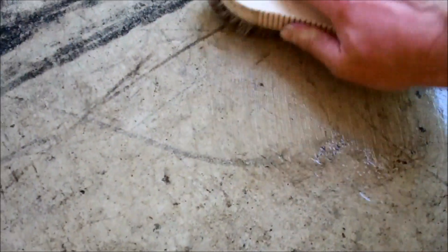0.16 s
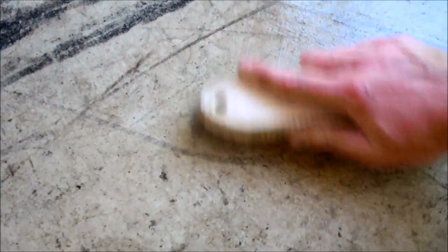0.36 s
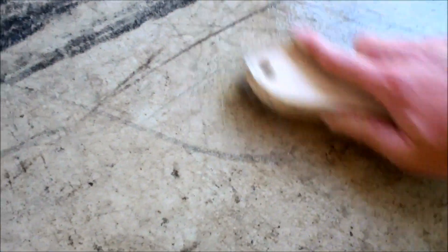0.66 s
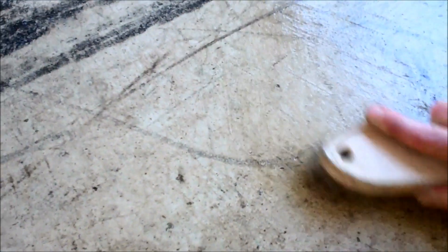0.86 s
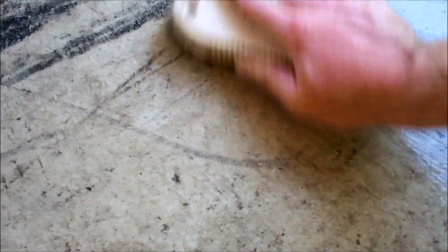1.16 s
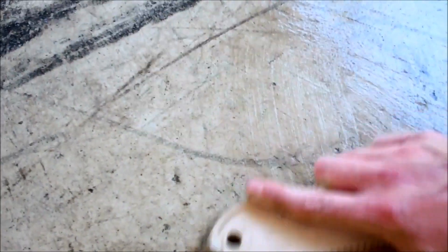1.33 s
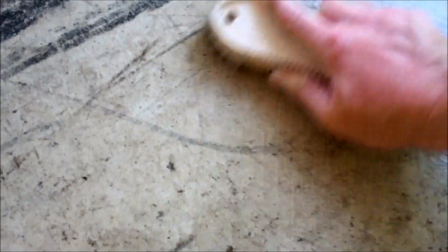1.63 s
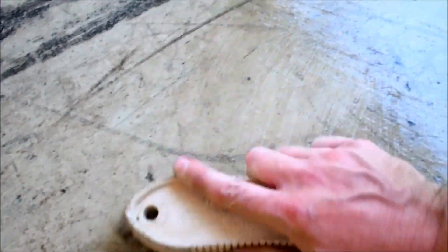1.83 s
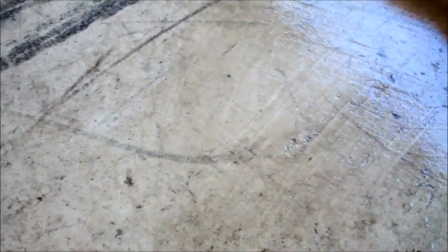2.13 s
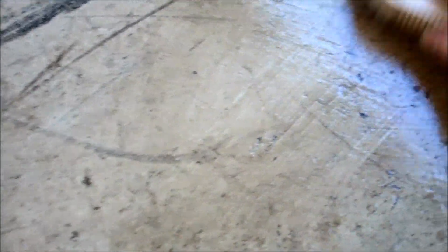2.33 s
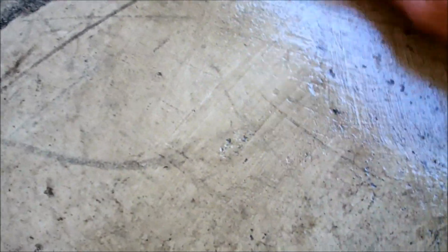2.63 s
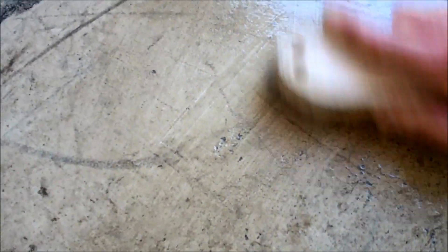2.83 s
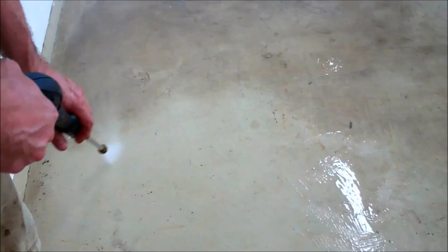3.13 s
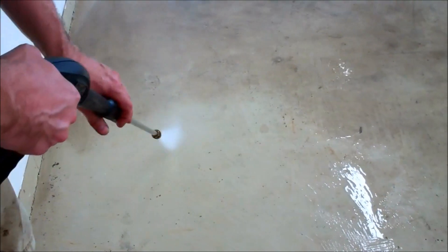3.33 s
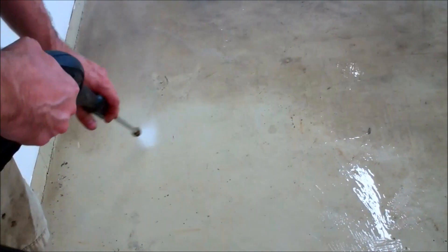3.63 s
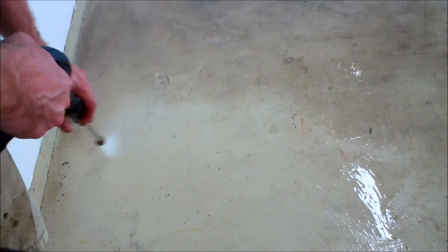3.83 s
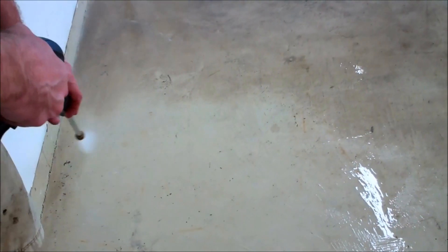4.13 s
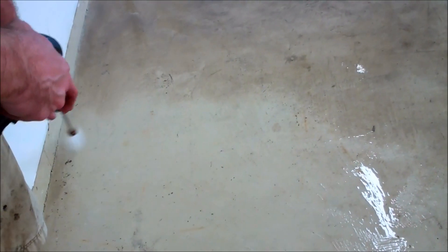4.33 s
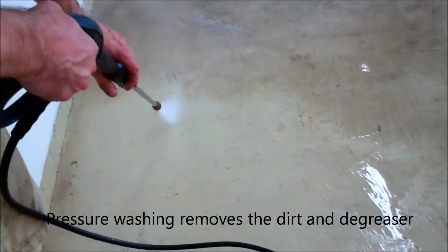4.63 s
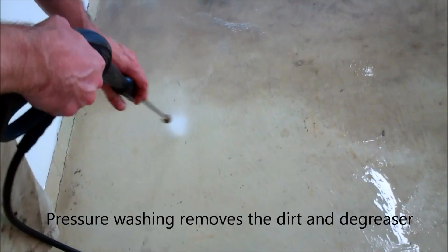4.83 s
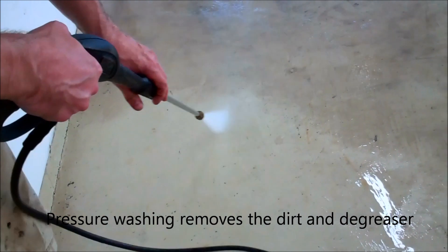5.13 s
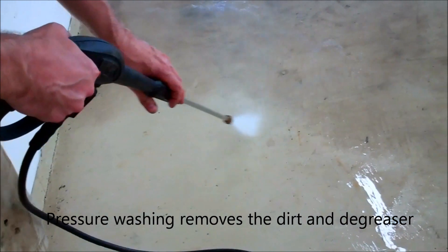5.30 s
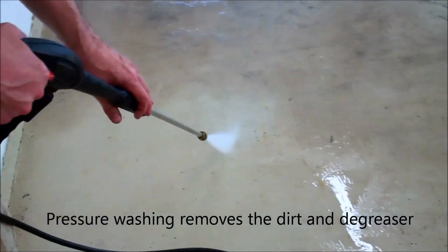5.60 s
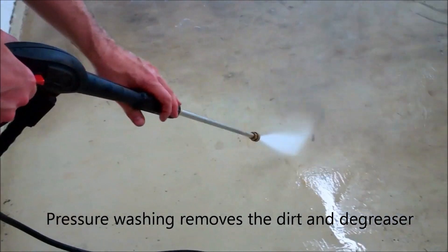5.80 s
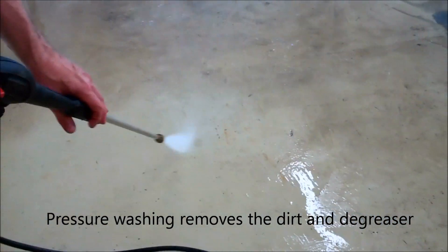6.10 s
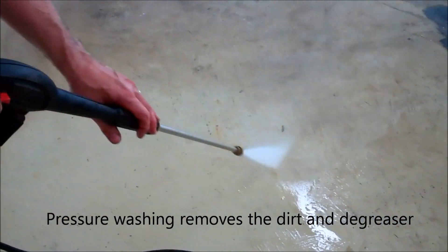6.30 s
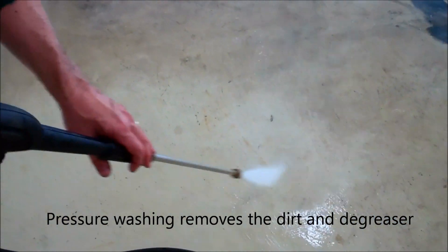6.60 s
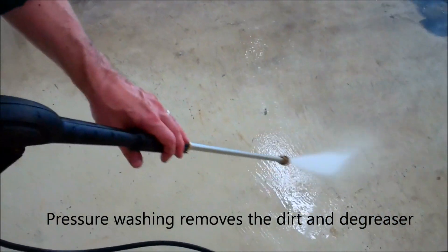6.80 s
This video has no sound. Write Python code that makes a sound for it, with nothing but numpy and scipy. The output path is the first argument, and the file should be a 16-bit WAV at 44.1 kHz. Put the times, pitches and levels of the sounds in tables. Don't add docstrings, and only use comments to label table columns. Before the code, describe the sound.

Close in a rumbling garage, a stiff wooden brush scrubs wet concrete in quick alternating strokes, gritty and scratchy, with a short room tail. A small metal clink rings left midway, followed by a wooden bump. Suddenly the sound changes to a pressure washer: dense water hiss on the floor, with motor and pump droning and whining steadily behind.

```python
import sys
import numpy as np
from scipy import signal
from scipy.fft import rfft, irfft
from scipy.io import wavfile
from scipy.ndimage import map_coordinates

SR = 44100
rng = np.random.default_rng(int(sys.argv[2]) if len(sys.argv) > 2 else 0)


def transcribe(u):
    v = np.clip(np.atleast_2d(u).T, -1, 1)
    q = np.round(v * 32767).astype(np.int16)
    wavfile.write(sys.argv[1], SR, q)


def to_linear_factor(level_db):
    exponent = np.asarray(level_db, float) / 20
    return 10 ** exponent


N = 306495
TIME = np.arange(N) / SR
BINS_HZ = np.maximum(np.arange(N // 2 + 1) * SR / N, 1)


def rms_one(x):
    return x / np.sqrt(np.mean(x ** 2) + 1e-20)


def in_time(rows):
    s, *columns = np.transpose(rows)
    return [np.interp(TIME, s, c) for c in columns]


def at_hz(points):
    hz, value = np.transpose(points)
    return np.interp(np.log(BINS_HZ), np.log(np.maximum(hz, 1)), value)


def drift(rate):
    r = np.exp(-80 * np.pi * rate / SR)
    noise = rng.standard_normal(N // 40 + 2002)
    slow = signal.lfilter([1], [1, -2 * r, r * r], noise)[2000:]
    return np.interp(np.arange(N) / 40, np.arange(len(slow)), rms_one(slow))


def rise(s, length):
    return np.sin(np.pi / 2 * np.clip(s / length, 0, 1))


def ring(clicks, hz, t60):
    r, w = to_linear_factor(-60 / (t60 * SR)), 2 * np.pi * hz / SR
    return signal.lfilter([0, np.sin(w)], [1, -2 * r * np.cos(w), r * r], clicks + 1e-18)


def grains(per_s, spread_db):
    size_db = spread_db * np.minimum(rng.exponential(1, (2, N)), 4)
    sizes = to_linear_factor(size_db) * rng.standard_normal((2, N))
    return sizes * (rng.random((2, N)) < per_s / SR)


def split(x, hz):
    low = irfft(rfft(x) / (1 + (BINS_HZ / hz) ** 6), N)
    return low, x - low


def two_ports(pair, gain, likeness, lead, balance):
    common, differing = rfft(pair) * gain
    alike = np.clip(at_hz(likeness), 0, 1)
    turn = to_linear_factor(at_hz(balance) / 2) * np.exp(.5j * at_hz(lead))
    common = np.sqrt(1 + alike) * common
    differing = np.sqrt(1 - alike) * differing
    out = irfft([(common + differing) * turn, (common - differing) / turn], N)
    return out / np.sqrt(np.mean(out.mean(axis=0) ** 2))


GARAGE_T60_S, GARAGE_DB = 0.67, -14


def garage(x):
    t = TIME[:SR // 2]
    after_gap = t > .008
    common, differing = rng.standard_normal((2, len(t))) * to_linear_factor(-60 * t / GARAGE_T60_S) * after_gap
    differing = signal.lfilter([1, -1], [1, -.8], differing)
    tail = signal.lfilter([1], [1, -.5], [common + differing, common - differing])
    tail = tail / np.sqrt(np.sum(tail ** 2, axis=1, keepdims=True))
    return to_linear_factor(GARAGE_DB) * signal.fftconvolve(x, tail, axes=1)[:, :N]


# frequency in Hz, left-right likeness from 0 to 1.
GARAGE_LIKENESS = [(100, .97), (1500, .92), (2400, .98), (3700, .82), (5500, .66), (8000, .7), (11000, .86),
                   (14000, .84)]
# frequency in Hz, lead of the left port in radians.
NO_LEAD = [(20, 0), (20000, 0)]
# frequency in Hz, left over right in dB.
GARAGE_BALANCE = [(300, -2.5), (1400, -1), (2400, 0), (4300, 0.3), (5400, 4.5), (8000, 2), (11000, 3.5),
                  (14000, 0)]
# frequency in Hz, density in dB per Hz.
AIR_COLOUR = [(18, -61), (30, -23), (96, -6), (269, -6), (412, -3.5), (553, -3.5), (1010, -8), (1230, -5),
              (1500, -9), (1950, -6.5), (3300, -120)]
# time in seconds, rumble in dB.
AIR_STIRS = [(0, -72), (0.3, -70.5), (0.4, -67), (0.75, -71.5), (1.0, -73.5), (1.9, -71.5), (2.2, -72.5),
             (2.3, -68), (2.65, -69), (2.72, -72.5), (2.98, -76.5), (3.06, -66.5), (3.2, -67)]
AIR_DB, AIR_SWAY_DB = 8, 2


def garage_air():
    noise = rng.standard_normal((2, N))
    air = two_ports(noise, to_linear_factor(at_hz(AIR_COLOUR)), GARAGE_LIKENESS, NO_LEAD, GARAGE_BALANCE)
    return to_linear_factor(in_time(AIR_STIRS)[0] + AIR_DB + AIR_SWAY_DB * drift(2.5)) * air


HUM_HZ = 53.05
# multiple of the hum frequency, level in dB.
HUM_ORDERS = [(2, -75.5), (3, -83.5), (4, -82.5), (8, -87.5)]
# middle in seconds, length in seconds, order, gain in dB.
SWELLS = [(0.4, .5, 8, 11), (1.12, 0.74, 4, 7), (1.7, 0.2, 3, 8), (1.6, 0.39, 2, -8), (2.1, .5, 2, 4),
          (2.353, .3, 4, 9), (2.344, 0.16, 8, 15), (2.6, 0.15, 8, 21.5), (2.654, 0.18, 3, 10),
          (2.777, 0.22, 4, 8.5), (3.2, 0.33, 2, -12)]


def far_hum():
    phase = 2 * np.pi * np.cumsum(HUM_HZ * (1 + 0.0044 * drift(4.0))) / SR
    hum = 0
    for k, db in HUM_ORDERS:
        swell_db = 0
        for middle, length, order, gain_db in SWELLS:
            if round(order) == round(k):
                swell_db = swell_db + gain_db * rise(length / 2 - abs(TIME - middle), length / 4) ** 2
        level = to_linear_factor(db + swell_db + 3.5 + 3.3 * drift(24))
        hum = hum + level * np.sin(round(k) * (phase + 1))
    return hum


# start in seconds, end in seconds, pressure at start in dB, pressure at end in dB.
STROKES = [(0.005, 0.155, -43, -37), (0.154, 0.321, -36.5, -51.5), (0.313, 0.471, -44.5, -37),
           (0.479, 0.649, -39.5, -45), (0.677, 0.953, -42, -39.5), (0.989, 1.272, -42, -43.5),
           (1.262, 1.488, -42.5, -37.9), (1.475, 1.71, -36.5, -51.5), (1.68, 1.966, -47, -37.3),
           (1.993, 2.343, -39, -45), (2.356, 2.607, -46.5, -39), (2.621, 2.857, -35.5, -54),
           (2.841, 3.035, -41.5, -45.5), (3.023, 3.225, -36, -55)]
REACH = [.75, .65, 1.15, .9, .8, 1.0, 1.0]
SPEED_UP_S, SLOW_DOWN_S = 0.06, 0.097
CREEP_DB = -56


def hand():
    loud, speed = to_linear_factor(CREEP_DB), 0
    for start, end, start_db, end_db in STROKES:
        moving = rise(TIME - start, SPEED_UP_S) * rise(end - TIME, SLOW_DOWN_S)
        pressure_db = np.interp(TIME, [start, end], [start_db, end_db])
        loud = loud + moving * to_linear_factor(pressure_db)
        speed = speed + moving
    turns = [row[0] for row in STROKES] + [STROKES[-1][1]]
    reach = np.zeros(len(turns))
    reach[1::2] = REACH
    return loud, speed, np.interp(TIME, turns, reach)


# frequency in Hz, width in Hz, peak in dB.
WOOD = [(1250, 155, 3), (3104, 490, -0.5), (4490, 370, -7)]
# frequency in Hz, density in dB per Hz.
SCRUB_COLOUR = [(60, -55), (200, -34), (450, -30), (800, -9), (1500, -3), (2200, 3), (3600, -2),
                (5200, -0.5), (7500, -4), (10000, -0.5), (14200, 4.5)]
# time in seconds, left lag in microseconds.
BRUSH_LAG = [(0.0, 21), (0.7, 28), (0.95, 55), (1.1, 27), (1.32, 22), (1.7, 40), (1.82, 27), (2.08, 31),
             (2.25, 56), (2.58, 52), (2.72, 31), (2.95, 29), (3.2, 26)]
BRISTLE_DB, BLOCK_DB, TIPS_DB = -6.5, 8, -0.5
FAST_BRISTLE_DB, FAST_BLOCK_DB, FAST_TIPS_DB = -1, -4, 5.5
FAR_BRISTLE_DB, FAR_BLOCK_DB, FAR_TIPS_DB = 13.5, 0.5, -1


def brush():
    loud, speed, reach = hand()
    block_db = BLOCK_DB + FAST_BLOCK_DB * speed + FAR_BLOCK_DB * reach
    bristle_db = BRISTLE_DB + FAST_BRISTLE_DB * speed + FAR_BRISTLE_DB * reach ** 2
    tips_db = TIPS_DB + FAST_TIPS_DB * speed + FAR_TIPS_DB * reach
    gain = to_linear_factor(at_hz(SCRUB_COLOUR))
    for hz, width, peak_db in WOOD:
        gain = gain * (1 + to_linear_factor(peak_db) / (1 + ((BINS_HZ - hz) / (width / 2)) ** 2))
    flicks = grains(20000, spread_db=-2.0) * to_linear_factor(0.88 * drift(15))
    scrub = two_ports(flicks, gain, GARAGE_LIKENESS, NO_LEAD, GARAGE_BALANCE)

    body, tips = split(scrub, 4600)
    block, edge = split(body, 1600)
    edge, bristles = split(edge, 2750)
    bristles, upper_edge = split(bristles, 3350)
    edge = edge + upper_edge

    half_lag = in_time(BRUSH_LAG)[0] * SR / 2e6
    left = map_coordinates(tips[0], [np.arange(N) - half_lag], order=5)
    right = map_coordinates(tips[1], [np.arange(N) + half_lag], order=5)
    dry = block * to_linear_factor(block_db + drift(55))
    dry = dry + edge * to_linear_factor(2.0 * drift(34))
    dry = dry + bristles * to_linear_factor(bristle_db + drift(23))
    dry = dry + np.array([left, right]) * to_linear_factor(tips_db)
    dry = loud * to_linear_factor(1.0) * dry
    return dry + garage(dry)


# time in seconds, strength in dB.
CLINKS = [
    (1.6165, -4),
    (1.632, 0),
    (1.651, -7),
]
# frequency in Hz, level in dB, t60 in seconds.
CLINK_MODES = [(3762, -52, .7), (3748, -57, .5), (3735, -47, .09), (3810, -53, .08), (6300, -56, .1)]


def metal_clink():
    at = [round(s * SR) for s, db in CLINKS]
    clicks = np.zeros(N)
    clicks[at] = to_linear_factor(np.array(CLINKS)[:, 1])
    metal = 0
    for hz, level_db, t60 in CLINK_MODES:
        metal = metal + to_linear_factor(level_db) * ring(clicks, hz, t60)
    dry = metal * to_linear_factor([[2.5], [-6]])
    return dry + garage(dry)


# time in seconds, peak in dB, hardness in dB per octave.
BUMPS = [(1.914, -48, 6), (1.927, -40.5, -4.5), (1.9385, -41.5, 8.5), (1.952, -61, 20), (1.964, -57, 15),
         (1.978, -56, 4)]
# frequency in Hz, level in dB, t60 in seconds.
BUMP_MODES = [(165, -11, .05), (250, -13, .03), (430, 0, .05), (530, -3, .04), (640, -10, .025),
              (760, -8, .09), (980, -7, .03)]


def wood_bump():
    at = [round(s * SR) for s, *strength in BUMPS]
    wood = 0
    for hz, level_db, t60 in BUMP_MODES:
        octaves = np.log2(hz / BUMP_MODES[2][0])
        clicks = np.zeros(N)
        clicks[at] = to_linear_factor([db + level_db + hardness * octaves for s, db, hardness in BUMPS])
        soft_contact = signal.lfilter([.15], [1, -.85], clicks)
        wood = -wood + ring(soft_contact, hz, t60)
    wood = split(wood, 80)[1]
    dry = wood * to_linear_factor([[-.6], [.6]])
    return dry + garage(dry)


# frequency in Hz, left-right likeness from 0 to 1.
WASH_LIKENESS = [(170, 1), (520, 0.74), (1100, 0.86), (1600, 0.41), (2500, 0.54), (4600, 0.16),
                 (8000, 0.45), (14000, 0.28)]
# frequency in Hz, lead of the left port in radians.
WASH_LEAD = [(200, 0), (2000, .13), (3400, .45), (4400, .85), (5400, .3), (8000, 0)]
# frequency in Hz, left over right in dB.
WASH_BALANCE = [(170, -1), (520, -3), (1000, -0.5), (3600, -.5), (5200, 3.5), (7800, 2.2), (9600, -1),
                (14000, -.5)]


def wash_ports(pair, colour):
    return two_ports(pair, to_linear_factor(at_hz(colour)), WASH_LIKENESS, WASH_LEAD, WASH_BALANCE)


# frequency in Hz, density in dB per Hz.
SPRAY_COLOUR = [(150, -53), (900, -15), (1500, -13), (2500, -7.5), (3500, -5.5), (5500, -8.5), (8500, -5),
                (11500, -0.5), (14200, 0.3)]


def spray(splash_db, jet_db, throb):
    drops = grains(20000, spread_db=-3.0) * to_linear_factor(0.13 * drift(39) + 0.09 * throb)
    splash, jet = split(wash_ports(drops, SPRAY_COLOUR), 5500)
    level = to_linear_factor(splash_db + 6.0 + 0.63 * drift(0.96))
    return level * (splash + to_linear_factor(jet_db - 7.5 + 0.69 * drift(12)) * jet)


MACHINE_DB = -50
# frequency in Hz, density in dB per Hz.
CASING_COLOUR = [(30, -28), (45, -36), (85, -49), (130, -18.5), (200, -14), (320, -1), (430, -4.5),
                 (600, -2.5), (800, -1), (900, -1.5), (1150, 0.5), (1450, -4), (2000, -3.5), (3000, -5.5)]


def casing(throb):
    noise = rng.standard_normal((2, N)) * to_linear_factor(0.27 * throb)
    return to_linear_factor(MACHINE_DB + 8.5) * wash_ports(noise, CASING_COLOUR)


WHINE_ORDER = 18
# multiple of the shaft speed, level in dB against whine or machine.
SHAFT_ORDERS = [(1, -51), (2, -24.5), (4, -17.5), (5, -18), (6, -24.5), (7, -15.5), (8, -14.5), (9, -17.5),
                (11, -20), (12, -15), (15, -33), (17, -16), (18, 1.5), (19, -20), (20, -13.5), (21, -15),
                (22, -18), (23, -19), (24, -17), (25, -13), (28, -17), (35, -16), (39, -16), (41, -15),
                (50, -13)]


def shaft(whine_db, turns):
    lines = 0
    for k, level_db in SHAFT_ORDERS:
        if k == WHINE_ORDER:
            base_db, unrest = whine_db + 3.5, .5
        else:
            base_db = MACHINE_DB + 2.0
            unrest = min(k / 16, 1.1)
        wobble = unrest * drift(7.3)
        level = to_linear_factor(base_db + level_db + 1.63 * unrest * drift(9.2))
        lines = lines + level * np.sin(2 * np.pi * (k * turns + rng.random()) + wobble)
    return lines * to_linear_factor([[-.8], [.8]])


SHAFT_HZ, PISTONS = 29.04, 3
# time in seconds, splash in dB, jet turned to the microphone in dB, whine in dB,
# shaft speed off its mean in per mille.
WASHER = [(3.2, -42.5, 2, -55, 0), (3.87, -43.5, 4, -56, 1.5), (4.2, -44, 0.5, -55.5, -3),
          (4.43, -44.5, -1.5, -55.5, -2.5), (4.65, -43.5, 2.5, -55, -2), (5.05, -43, 1.5, -55, -3),
          (5.3, -44, 1.5, -52, 1), (5.9, -41.5, 1.5, -50.5, 0.5), (6.3, -41, 1.5, -51.5, 0.5),
          (6.65, -41, 4.5, -49.5, 1.5), (6.95, -41, -1, -50.5, 3)]


def washer():
    splash_db, jet_db, whine_db, off = in_time(WASHER)
    turns = np.cumsum(SHAFT_HZ * (1 + off / 1e3 + 0.00054 * drift(2.64))) / SR
    throb = np.cos(2 * np.pi * PISTONS * turns) + 0.63 * np.cos(2 * np.pi * turns)
    return spray(splash_db, jet_db, throb) + casing(throb) + shaft(whine_db, turns)


CUT_S, CUT_FADE_S = 3.212, .006


def scene():
    later = np.clip((TIME - CUT_S) / CUT_FADE_S + .5, 0, 1)
    scrubbing = garage_air() + far_hum() + brush() + metal_clink() + wood_bump()
    return scrubbing * (1 - later) + washer() * later


def top_cut(x):
    return signal.sosfilt(signal.butter(12, 14360, fs=SR, output="sos"), x)


TOP_HZ = 14230


def record(dry):
    mix = irfft(rfft(dry) * (BINS_HZ < TOP_HZ), N)
    return top_cut(mix)


dry = scene()
out = record(dry)
transcribe(out)
```